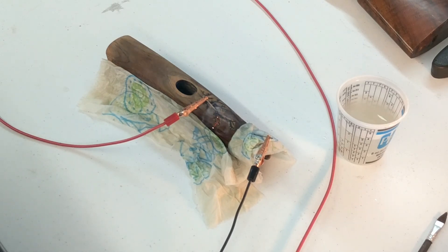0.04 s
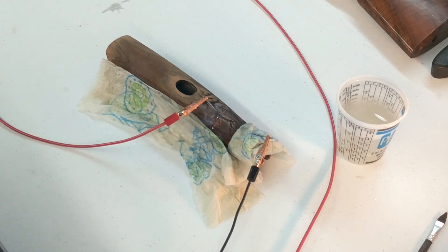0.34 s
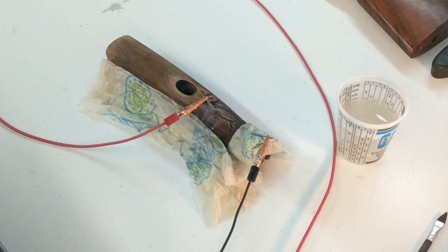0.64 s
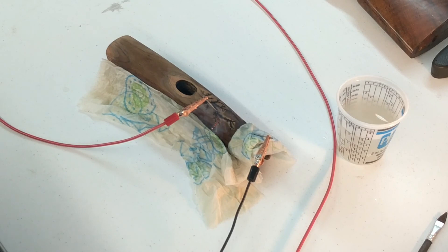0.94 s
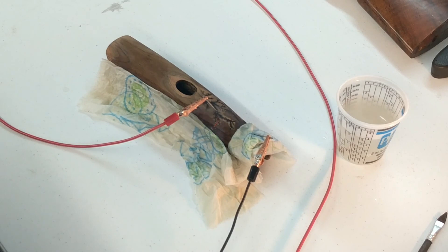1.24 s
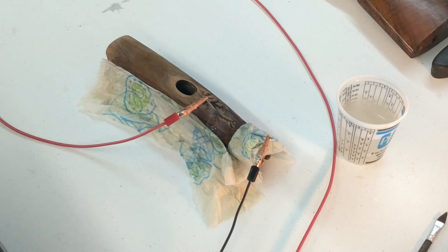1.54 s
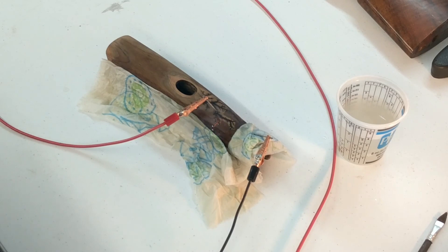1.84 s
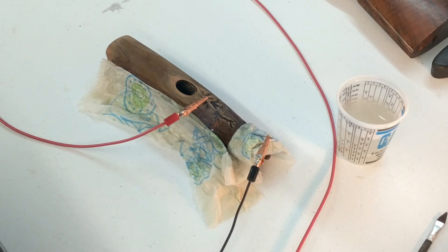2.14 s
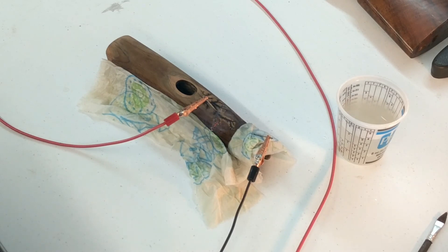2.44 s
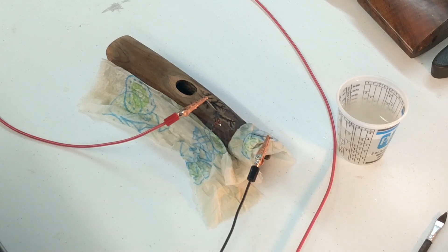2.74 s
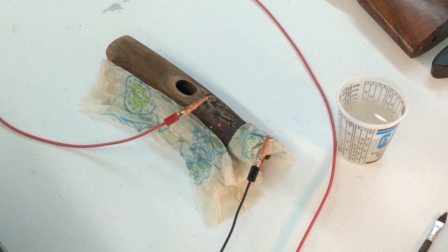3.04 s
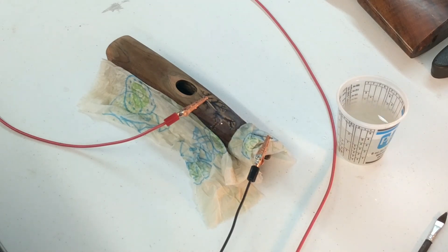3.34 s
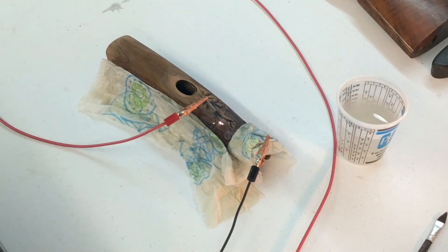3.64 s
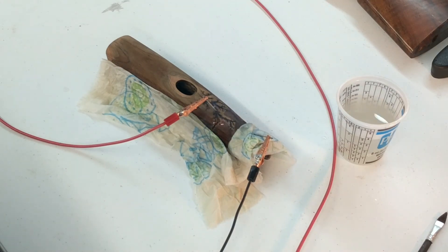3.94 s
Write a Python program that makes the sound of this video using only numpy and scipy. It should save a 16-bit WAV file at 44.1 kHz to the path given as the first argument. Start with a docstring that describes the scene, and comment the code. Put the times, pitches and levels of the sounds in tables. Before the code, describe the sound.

Low engine-like drone swelling unevenly through the walls, with soft equipment hum and hiss.

```python
"""A deep, wavering drone, probably an engine beyond the walls, fills a quiet workroom.
It slowly gathers speed, swelling and fading, while its booming rush grows.
In the room, equipment hums and buzzes on the mains, with fan tones, soft hiss and a faint high whine.
The hiss swells once, briefly; then a thin band of the rush glides upward."""
import sys
import numpy as np
from scipy import signal
from scipy.fft import rfft, irfft
from scipy.io import wavfile

SR = 44100
rng = np.random.default_rng(int(sys.argv[2]) if len(sys.argv) > 2 else 0)


def digitize_waveform(pressure):
    """Quantize a signal to 16-bit integers and store it at the path in sys.argv[1].

    Rows of a 2-D input are taken as channels; values are limited to [-1, 1].
    """
    field = np.atleast_2d(pressure).T
    bounded = np.clip(field, -1, 1)
    quanta = np.round(bounded * 32767).astype(np.int16)
    wavfile.write(sys.argv[1], SR, quanta)


N = 176400
T = np.arange(N) / SR
HZ = np.maximum(np.arange(N // 2 + 1) * SR / N, 1)


def from_db(db):
    """Decibels to gain."""
    return 10 ** (np.asarray(db) / 20)


def unit_rms(x):
    """Scale to unit rms."""
    return x / np.sqrt(np.mean(x ** 2) + 1e-30)


def automation(rows):
    """One curve for each column that follows a table's times."""
    times, *columns = np.transpose(rows)
    return [np.interp(T, times, column) for column in columns]


def equalise(x, curve):
    """Shape a signal with an EQ curve of (frequency [Hz], gain [dB])."""
    hz, db = np.transpose(curve)
    gain = from_db(np.interp(np.log(HZ), np.log(hz), db))
    return irfft(rfft(x) * gain, N)


def noise(gain):
    """Unit noise with the given gain at each frequency."""
    return unit_rms(irfft(rfft(rng.standard_normal(N)) * gain, N))


def drift(rate_hz):
    """Smooth random modulation of spread 1."""
    return noise(1 / (1 + (HZ / rate_hz) ** 2))


def resonance(centre, width):
    """Unit noise ringing in one resonance."""
    return noise(1 / np.hypot(1, (HZ - centre ** 2 / HZ) / width))


def tone(hz, db):
    """A sine that follows a pitch and an rms level."""
    turns = np.cumsum(hz * np.ones(N)) / SR + rng.random()
    return np.sqrt(2) * from_db(db) * np.sin(2 * np.pi * turns)


# The drone's slow climb: (time [s], pitch [Hz])
DRONE_CLIMB = [(0, 63.24), (1, 64.2), (2, 65.5), (3, 66.83), (3.5, 66.75), (4, 67.2)]
# Swells and dips of its fundamental: (time [s], level [dB])
DRONE_ENVELOPE = [(0.0, -46), (0.09, -40), (0.37, -43), (0.43, -55), (0.51, -37), (0.59, -39), (0.73, -51),
                  (0.81, -43.5), (0.92, -35), (1.01, -42), (1.1, -33), (1.35, -34.5), (1.46, -31),
                  (1.79, -39), (1.84, -47), (1.94, -32.5), (2.02, -34), (2.1, -28.5), (2.67, -40),
                  (2.76, -31.5), (2.9, -38.5), (2.94, -35), (3.13, -49), (3.15, -36), (3.27, -30.5),
                  (3.53, -25.5), (3.97, -30.5), (4.0, -32)]
# Its shifting overtone mix: (time [s], level [dB] of each of harmonics 2, 3, 4, 5, 7)
OVERTONE_MIX = [(0, -61.5, -58, -70, -91, -95), (.45, -81, -52.5, -74, -82, -79),
                (.75, -52, -54, -79, -87, -75), (1.6, -53, -67, -79, -90, -84),
                (2.3, -58, -57.5, -85, -87, -66), (3.0, -60.5, -58, -62.5, -85, -70),
                (3.45, -58.5, -56.5, -63, -62.5, -63), (4, -56.5, -62.5, -77.5, -64, -86)]

def drone():
    """A heavy fundamental and weak overtones rise together as the drone gathers speed."""
    hz, = automation(DRONE_CLIMB)
    db, = automation(DRONE_ENVELOPE)
    hz = hz * (1 + 0.0042 * drift(rate_hz=6))
    out = tone(hz, db + .6 * drift(rate_hz=10))
    for harmonic, level in zip((2, 3, 4, 5, 7), automation(OVERTONE_MIX)):
        out += tone(harmonic * hz, level + 1.5 * drift(rate_hz=4.1))
    return out


# The build of the rush: (time [s], level [dB])
RUSH_BUILD = [(0, -58.5), (1, -58.5), (2, -54.5), (3, -50.5), (3.5, -51), (4, -48.5)]
# Its dark colour: (frequency [Hz], relative gain [dB])
RUSH_EQ = [(25, -13), (40, -3), (55, 4), (75, -3.5), (110, -8), (150, -11), (230, -12.5), (450, -18.5),
           (700, -20.5), (1000, -23), (1300, -24.5), (1550, -30), (2200, -32.5), (5000, -42.5),
           (9000, -65.5)]
# Its booming resonances: (centre [Hz], width [Hz], level relative to the body [dB])
RUSH_BOOMS = [(90.8, 6.2, -1), (178.5, 7.4, -18), (211, 5.1, -12.5), (441, 22, -17)]

def rush():
    """Dull noise grows with the drone and booms in narrow resonances."""
    db, = automation(RUSH_BUILD)
    body = unit_rms(equalise(rng.standard_normal(N), RUSH_EQ))
    booms = sum(from_db(level) * resonance(hz, width) for hz, width, level in RUSH_BOOMS)
    return from_db(db) * (body + booms)


MAINS_HZ = 60.02
# The hum's partials: (multiple of the mains frequency)
HUM_HARMONICS = (2, 6, 8, 10, 14, 16, 20, 26, 29, 30, 34)
# Their balance, in the same order: (level [dB])
HUM_MIX = [-67.5, -66.5, -73.5, -77.5, -83, -80, -75.5, -81, -83.5, -84, -83.5]
# The casing's ring: (frequency [Hz], relative level [dB], time to fall 60 dB [s])
CASING_MODES = [(2150, -11, 0.0044), (3930, -0.5, 0.0039), (6150, -5.5, .0015)]

def mains():
    """A steady hum, and a buzz of sharp ticks that ring a casing on every half cycle."""
    hum = sum(tone(k * MAINS_HZ, db + .7 * drift(rate_hz=2.8)) for k, db in zip(HUM_HARMONICS, HUM_MIX))
    since_tick = T % (1 / (2 * MAINS_HZ))
    ticks = sum(from_db(db - 60 * since_tick / t60) * np.sin(2 * np.pi * hz * since_tick)
                for hz, db, t60 in CASING_MODES)
    buzz_db = -80 + 1.7 * drift(rate_hz=30)
    return hum + from_db(buzz_db) * unit_rms(ticks)


# The fan's two notes: (pitch [Hz], level [dB])
FAN_TONES = [(511.2, -73), (761.9, -65)]
# The bed of air and hiss: (frequency [Hz], noise density [dB per Hz])
AIR_EQ = [(25, -91.5), (95, -72), (170, -82.5), (300, -91), (700, -95), (1100, -100.5), (2300, -101.5),
          (3500, -107), (4400, -110.5), (5300, -110), (6000, -116), (7500, -118), (10500, -120),
          (15500, -121)]

def fan():
    """Two tones waver with the fan's speed, over airy hiss that throbs lightly with the mains."""
    speed = 1 + 0.0011 * drift(rate_hz=2.14)
    tones = sum(tone(hz * speed, db + 1.42 * drift(rate_hz=8.2)) for hz, db in FAN_TONES)
    white = rng.standard_normal(N) * np.sqrt(SR / 2)  # unit power per Hz
    throb = 1 + 0.049 * np.sin(2 * np.pi * 2 * MAINS_HZ * T)
    return tones + equalise(white * throb, AIR_EQ)


# The whine's slow wander: (time [s], pitch [Hz])
WHINE_WANDER = [(0, 9600), (2.1, 9565), (2.4, 9650), (3.2, 9645), (4, 9603)]
# The sheen around it: (centre [Hz], width [Hz], level [dB])
WHISTLE_BANDS = [(5340, 79, -94.5), (8350, 140, -88.5), (9350, 77, -88), (11620, 120, -90.5)]

def whine(level_db=-85, jitter_hz=27.4):
    """A power supply's jittery high tone among fainter, broader whistles."""
    hz, = automation(WHINE_WANDER)
    core = tone(hz + jitter_hz * drift(rate_hz=60), level_db + 2.1 * drift(rate_hz=75))
    whistles = sum(from_db(db) * resonance(centre, width) for centre, width, db in WHISTLE_BANDS)
    return core + whistles


def hiss_swell(peak_s=1.26, half_width_s=0.073, peak_db=-70.5):
    """One short breath of hiss fades in and out."""
    envelope = np.exp(-((T - peak_s) / half_width_s) ** 2)
    return from_db(peak_db) * envelope * resonance(centre=2540, width=900)


# The riser in the rush: (time [s], centre [Hz], level [dB])
RISER_PATH = [(0, 2170, -99), (1.5, 2360, -76), (2.1, 2680, -75.5), (2.7, 3050, -71), (3.4, 3730, -71),
              (4, 4380, -83)]

def rush_riser(width_oct=0.16):
    """A bright band of the rush glides upward, crossfading through semitone-wide strips of noise."""
    centre, db = automation(RISER_PATH)
    band = 0
    for hz in np.geomspace(1600, 6400, 25):
        strip = noise(np.abs(np.log2(HZ / hz)) < 1 / 24)
        band += strip * np.exp(-.5 * (np.log2(hz / centre) / width_oct) ** 2)
    return from_db(db) * unit_rms(band)


def scene():
    """The mono mix, heard from one spot above the bench."""
    return (drone() + rush() + mains() + fan() + whine() + hiss_swell() + rush_riser())[None]


def record(dry, fade_s=.006):
    """Trim the deepest rumble, fade both ends and cut the extreme top."""
    low_cut = signal.butter(2, 18, "high", fs=SR, output="sos")
    top_cut = signal.ellip(12, .1, 70, 15750, fs=SR, output="sos")
    trimmed = signal.sosfiltfilt(low_cut, dry, padtype="even", padlen=4000)
    to_edge_s = np.minimum(T, T[::-1])
    fade = np.sin(np.pi / 2 * np.minimum(to_edge_s / fade_s, 1)) ** 2
    return signal.sosfilt(top_cut, fade * trimmed)


dry = scene()
out = record(dry)
digitize_waveform(out)
```